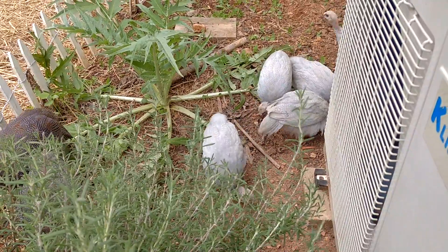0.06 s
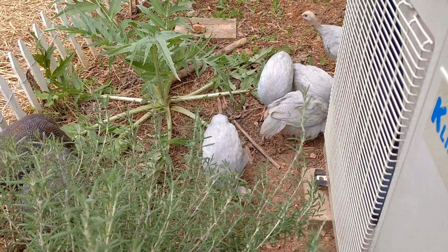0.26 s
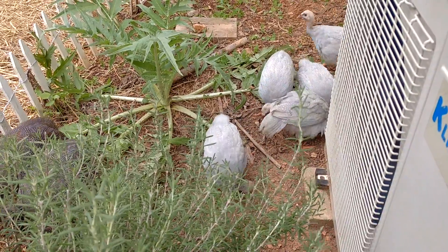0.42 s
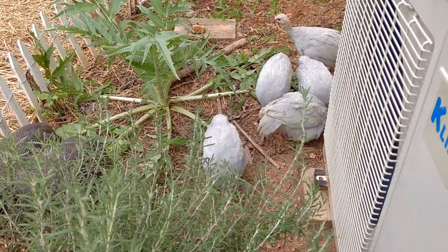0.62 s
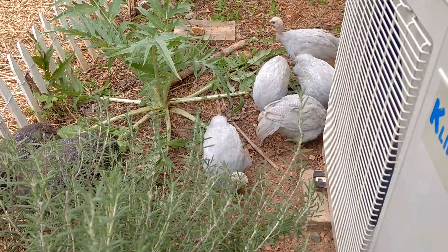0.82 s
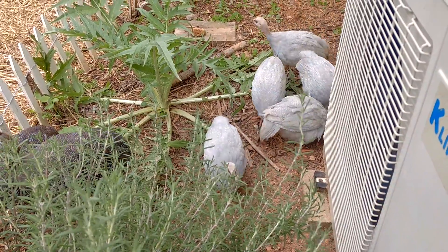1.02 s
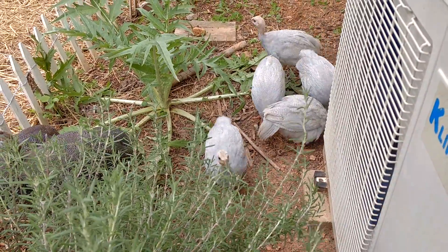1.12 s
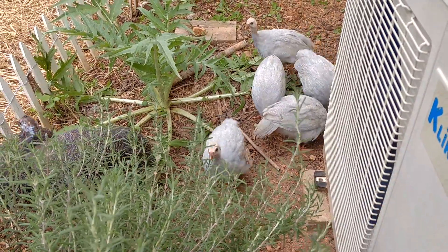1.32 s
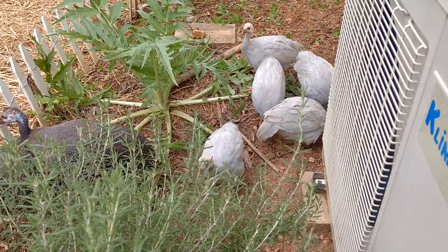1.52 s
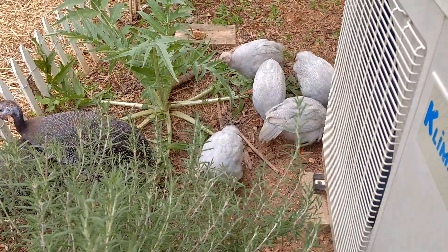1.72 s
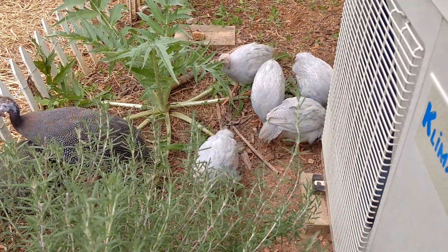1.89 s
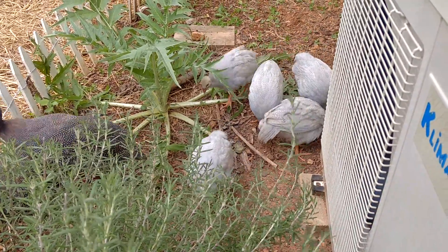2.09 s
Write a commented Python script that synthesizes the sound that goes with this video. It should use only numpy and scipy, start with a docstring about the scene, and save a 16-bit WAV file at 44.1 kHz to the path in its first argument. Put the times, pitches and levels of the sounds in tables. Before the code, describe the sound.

Guinea fowl forage in a yard: an adult gives two brief two-part calls and soft clucks, young birds whistle thin bending chirps, over a nearby fan's steady rush, with faint rustles and low air bumps on the microphone.

```python
"""A fan's broadband rush comes first, over a faint wavering hum; guinea fowl forage beside this cooling unit.
An adult gives two long two-voiced calls, soft notes and clucks: jittering near-sines, some with overtones and air.
The young whistle thin bending chirps. Gated noise makes ticks of litter and rustles of plants; air bumps the
microphones as short low swings. Sparse echoes scatter the birds around the yard, and the recorder widens the
stereo pair with a delayed, inverted crossfeed."""
import sys
import numpy as np
from scipy import signal
from scipy.fft import rfft, irfft, next_fast_len
from scipy.io import wavfile
from scipy.ndimage import uniform_filter1d, map_coordinates

SR = 44100
rng = np.random.default_rng(int(sys.argv[2]) if len(sys.argv) > 2 else 0)


def wav_out(sig):
    """Save sig, one row per channel (or a flat mono array), as 16-bit PCM at SR to the path in sys.argv[1]."""
    wavfile.write(sys.argv[1], SR, np.round(np.clip(np.atleast_2d(sig).T, -1, 1) * 32767).astype(np.int16))


N = 94815  # length in samples

FAR_MIC_DB = -19  # birds at the left microphone, relative to the right
ADULT_LAG_MS = 0.15  # later arrival at the left microphone
RASP_RATE_HZ = 960  # upper rate of the irregular flutter in a voice
AIR_HZ, AIR_WIDTH_HZ = 2496, 1100  # band of breath noise in the adult's voice
LOW_PHASE = 2.21  # radians by which the left channel leads in the air bumps


def amp(db):
    """Decibels to gain."""
    return 10 ** (np.asarray(db) / 20)


def unit(x):
    """Scales to rms 1."""
    return x / np.sqrt(np.mean(x ** 2) + 1e-20)


def read(points, hz):
    """Reads a table on a log-frequency axis."""
    f, value = np.transpose(points)
    return np.interp(np.log(hz + 1), np.log(f), value)


def add(mix, s, sound):
    """Mixes a stereo sound in at a time in seconds."""
    part = mix[:, max(round(s * SR), 0):][:, :sound.shape[1]]
    part += sound[:, :part.shape[1]]


def wander(size, rate_hz):
    """Smooth random motion: noise of rms 1, rolled off above a rate."""
    f = np.fft.rfftfreq(N, 1 / SR)
    spectrum = rfft(rng.standard_normal(N)) / (1 + (f / rate_hz) ** 4)
    return unit(irfft(spectrum, N))[:size]


def hiss(size, centre_hz, width_hz):
    """A band of noise of about rms 1: a carrier whose strength and pitch both wander."""
    strength = wander(size, width_hz)
    hz = centre_hz + width_hz / 2 * wander(size, 300)
    return np.sqrt(2) * strength * np.cos(2 * np.pi * np.cumsum(hz) / SR)


def place(x, lag_ms, far_db=FAR_MIC_DB):
    """A sound reaches the left microphone weaker and at a slightly different time."""
    at = np.arange(len(x)) - lag_ms * SR / 1000
    left = amp(far_db) * map_coordinates(x, [at], order=3)
    return np.array([left, x])


def syrinx(hz, gain, overtones_db, jitter, rasp=0):
    """A near-sine with overtones; its pitch jitters and its strength may flutter."""
    phase = 2 * np.pi * np.cumsum(hz * (1 + jitter * wander(len(hz), 240))) / SR
    overtones = sum(amp(db) * np.sin((k + 2) * phase) for k, db in enumerate(overtones_db))
    tone = np.sin(phase) + overtones
    return np.sqrt(2) * gain * tone * (1 + rasp * wander(len(hz), RASP_RATE_HZ))


def arch(length):
    """Progress 0-1 through a note, and a half-sine swell."""
    u = np.linspace(0, 1, round(length * SR))
    return u, np.abs(np.sin(np.pi * u))


def follow(curve):
    """Pitch and level of a voice, sample by sample."""
    s, hz, db = np.transpose(curve)
    t = np.arange(s[0], s[-1], 1 / SR)
    return np.interp(t, s, hz), np.interp(t, s, db)


# Upper voice of the two long calls, one curve per call: t/s, f/Hz, level/dB
UPPER_CURVES = [
    [(.194, 1610, -46), (.204, 1616, -37), (.214, 1647, -28.5), (.234, 1633, -24.5), (.251, 1643, -25.5),
     (.267, 1580, -38), (.277, 1680, -41), (.302, 1780, -48)],
    [(1.083, 1526, -47), (1.097, 1587, -35), (1.124, 1522, -29.5), (1.133, 1632, -23.5), (1.141, 1647, -26),
     (1.152, 1620, -26.5), (1.168, 1694, -32), (1.203, 2050, -40)],
]
# Its overtones from the 2nd harmonic up: level/dB relative to the fundamental
UPPER_OVERTONES = [-27]


def upper_voice():
    """One side of the adult's syrinx: a nearly pure tone with a slight flutter."""
    out = np.zeros((2, N))
    for curve in UPPER_CURVES:
        hz, db = follow(curve)
        voice = syrinx(hz, amp(db), UPPER_OVERTONES, jitter=0.0058, rasp=0.032)
        add(out, curve[0][0], place(voice, ADULT_LAG_MS))
    return out


RASP_DB, AIR_DB = -33, -16  # flutter depth at full effort; breath noise relative to the tone
FULL_DB, OVERTONE_GROWTH = -23, 1.2  # level of full effort; dB lost by overtones and rasp per dB below it
# Lower voice of the two long calls, one curve per call: t/s, f/Hz, level/dB
LOWER_CURVES = [
    [(.24, 1448, -54), (.255, 1374, -32), (.263, 1281, -24.5), (.275, 1265, -26.5), (.290, 1330, -25),
     (.300, 1360, -25.5), (.305, 1470, -40), (.310, 1390, -38), (.317, 1400, -52)],
    [(1.083, 1305, -65), (1.097, 1289, -32.5), (1.122, 1274, -29.5), (1.147, 1330, -31),
     (1.160, 1274, -21.5), (1.170, 1266, -18.5), (1.180, 1323, -20.5), (1.191, 1350, -23.5),
     (1.201, 1460, -24), (1.207, 1560, -51), (1.212, 1520, -27), (1.219, 1460, -61)],
]
# Its overtones from the 2nd harmonic up, at full effort: level/dB relative to the fundamental
LOWER_OVERTONES = [-6.5, -14.5, -30.5]


def lower_voice():
    """The richer side of the syrinx: overtones and rasp grow with effort, over breath noise."""
    out = np.zeros((2, N))
    for curve in LOWER_CURVES:
        hz, db = follow(curve)
        effort_db = np.minimum(db - FULL_DB, 0) * OVERTONE_GROWTH
        overtones = [level + effort_db for level in LOWER_OVERTONES]
        voice = syrinx(hz, amp(db), overtones, jitter=0.0027, rasp=amp(RASP_DB + effort_db))
        air = amp(db + AIR_DB) * hiss(len(hz), AIR_HZ, AIR_WIDTH_HZ)
        add(out, curve[0][0], place(voice + air, ADULT_LAG_MS))
    return out


# Soft, level notes of the adult: start t/s, length t/s, f/Hz, peak level/dB
QUIET_NOTES = [(0.04, 0.04, 1540, -42), (0.032, 0.029, 2160, -44.5), (0.151, 0.023, 1543, -46),
               (0.15, 0.023, 2300, -42), (0.18, 0.037, 2350, -43), (0.226, 0.062, 2340, -37),
               (0.265, 0.039, 2170, -40), (0.719, 0.036, 2365, -34), (.738, 0.016, 3180, -42),
               (0.922, 0.043, 2315, -36.5), (0.936, 0.025, 1557, -35.5), (0.939, 0.021, 1276, -33.5),
               (0.981, 0.05, 3575, -40.5), (1.069, 0.067, 2297, -31), (1.13, 0.026, 2334, -26),
               (1.139, 0.056, 2144, -39)]


def soft_notes():
    """Steady-pitched tones without overtones that swell and fade, with a marked flutter."""
    out = np.zeros((2, N))
    for start, length, hz, db in QUIET_NOTES:
        u, swell = arch(length)
        note = syrinx(hz + 0 * u, amp(db) * swell ** 0.72, [], jitter=0.0088, rasp=0.21)
        add(out, start, place(note, ADULT_LAG_MS))
    return out


CLUCK_FALL = 0.15  # pitch drop over a cluck, as a share of its middle pitch
CLUCK_SHARP = 2.6  # how pointed a cluck swells
CLUCK_AIR_DB, CLUCK_FAR_MIC_DB = -16.5, -8  # puff of air relative to the tone; left relative to right
# Clucks: centre t/s, length t/s, f/Hz, peak level/dB, 2nd and 3rd harmonic level/dB, left lag t/ms
CLUCK_NOTES = [(0.4259, 0.026, 1097, -27, -20, -1.5, 0.17), (.754, .028, 863, -30.5, -13, -22, 0.25),
               (1.862, .019, 1414, -22.5, -2.5, -6, -0.14)]


def clucks():
    """Short falling tones with two strong harmonics, a rough flutter and a puff of air."""
    out = np.zeros((2, N))
    for centre, length, hz, db, second_db, third_db, lag_ms in CLUCK_NOTES:
        u, swell = arch(length)
        falling_hz = hz * (1 - CLUCK_FALL * (u - .5))
        gain = amp(db) * swell ** CLUCK_SHARP
        tone = syrinx(falling_hz, gain, [second_db, third_db], jitter=0.0067, rasp=0.33)
        puff_gain = amp(db + CLUCK_AIR_DB) * swell ** (2 * CLUCK_SHARP)
        puff = puff_gain * hiss(len(u), AIR_HZ, AIR_WIDTH_HZ)
        add(out, centre - length / 2, place(tone + puff, lag_ms, CLUCK_FAR_MIC_DB))
    return out


def adult():
    """Two voices of one syrinx sound the long calls; soft notes and clucks come around them."""
    return upper_voice() + lower_voice() + soft_notes() + clucks()


YOUNG_FAR_MIC_DB = -19.5  # the young at the left microphone, relative to the right
CHIRP_ARCH, CHIRP_OCTAVE_DB = 1.3, -28  # power of the swell; 2nd harmonic relative to the fundamental
# Chirps: start t/s, length t/s, start f/Hz, middle f/Hz, end f/Hz, peak level/dB, left lag t/ms
YOUNG_CHIRPS = [(0.124, 0.036, 3110, 2740, 2500, -50, 0.16), (0.169, 0.064, 3780, 3470, 2840, -38, 0.19),
                (0.394, .035, 1810, 2350, 2230, -34.5, 0.067), (0.425, 0.055, 2690, 2470, 2330, -43, 0.12),
                (0.59, 0.063, 2105, 2588, 2110, -26, 0.26), (0.948, 0.067, 5250, 4900, 4600, -49.5, .2),
                (.994, .03, 4570, 3950, 3350, -30.5, 0.19), (1.022, 0.012, 3550, 3030, 2520, -40, 0.22),
                (1.008, .06, 2660, 2430, 2370, -39.5, 0.27), (1.44, 0.046, 2620, 2370, 2320, -44, 0.28),
                (1.507, 0.064, 2297, 2815, 2320, -30, 0.44), (1.552, 0.015, 3950, 3790, 3700, -46.5, 0.19),
                (1.753, 0.09, 2087, 2915, 2880, -38, 0.27), (1.80, 0.05, 2816, 3080, 3330, -40.5, 0.2),
                (1.842, 0.01, 3800, 3360, 3060, -36, 0.14), (1.848, .012, 2950, 2870, 2700, -29.5, 0.27),
                (1.903, 0.043, 4720, 4320, 4120, -52, 0.14), (1.927, 0.0338, 4026, 3800, 3230, -35, 0.16),
                (1.922, 0.034, 2430, 2300, 2060, -48, 0.24)]


def young():
    """Thin whistles that bend smoothly through three pitches."""
    out = np.zeros((2, N))
    for start, length, first_hz, middle_hz, last_hz, db, lag_ms in YOUNG_CHIRPS:
        u, swell = arch(length)
        bend = np.polyfit([0, .5, 1], [first_hz, middle_hz, last_hz], 2)
        gain = amp(db) * swell ** CHIRP_ARCH
        chirp = syrinx(np.polyval(bend, u), gain, [CHIRP_OCTAVE_DB], jitter=0.0057, rasp=0.06)
        add(out, start, place(chirp, lag_ms, YOUNG_FAR_MIC_DB))
    return out


TICK_S = .001  # decay to 1/e
# Ticks of dry litter underfoot: t/s, f/Hz, level/dB (before a doubling of the gain)
LITTER_TICKS = [(0.061, 5300, -44), (.753, 12500, -30), (1.10, 12000, -32), (1.494, 11000, -39),
                (1.87, 13500, -28.5), (1.9, 6200, -41), (1.90, 12800, -41)]


def litter():
    """Dry stalks snap under the birds' feet: noise bands that die within milliseconds."""
    out, t = np.zeros((2, N)), np.arange(600) / SR
    for s, hz, db in LITTER_TICKS:
        snap = wander(len(t), 2300) * np.cos(2 * np.pi * hz * t) * np.exp(-t / TICK_S)
        add(out, s, place(2 * amp(db) * snap, ADULT_LAG_MS))
    return out


RUSTLE_GRAIN_DB = 3  # rms of the random level changes
# Rustles of leaves and straw: centre t/s, half width to 1/e t/s, centre f/Hz, noise width f/Hz, level/dB
PLANT_RUSTLES = [(0.34, 0.048, 3700, 500, -45.5), (.72, 0.085, 3700, 570, -46.5),
                 (1.09, 0.045, 5300, 1160, -45.5), (1.09, .04, 12000, 2600, -42),
                 (0.31, 0.043, 9500, 2900, -48), (2.2, 0.029, 3600, 487, -40),
                 (1.422, 0.058, 5500, 1100, -51.5)]


def rustles():
    """Grainy swishes of banded noise as the birds push through the plants."""
    t = np.arange(N) / SR
    swish = np.zeros(N)
    for centre, width, hz, band_hz, db in PLANT_RUSTLES:
        grain = amp(db + RUSTLE_GRAIN_DB * wander(N, 270))
        swell = np.exp(-((t - centre) / width) ** 2)
        swish += grain * swell * hiss(N, hz, band_hz)
    return place(swish, ADULT_LAG_MS)


# Dull bumps of air on the microphones: centre t/s, half width to 1/e t/s, f/Hz, peak level/dB
AIR_BUMPS = [(.02, 0.044, 74, -31), (.96, .025, 64.7, -38), (1.031, .015, 113, -32),
             (1.44, 0.033, 65.4, -37), (0.3425, 0.004, 131, -13), (0.376, 0.03, 81.6, -26),
             (0.506, 0.013, 124, -23), (1.268, 0.017, 78, -30), (1.387, 0.017, 115, -21.5),
             (1.578, 0.0018, 142, -18), (1.598, 0.0033, 158, -18), (1.609, 0.0031, 251, -14),
             (1.635, 0.015, 80, -28.5)]


def bumps():
    """Short, low swings of pressure under a bell-shaped swell, the left leading in phase."""
    out = np.zeros((2, N))
    lead = np.array([[LOW_PHASE], [0]])
    for centre, width, hz, db in AIR_BUMPS:
        t = np.arange(N) / SR - centre
        out += amp(db) * np.exp(-(t / width) ** 2) * np.cos(2 * np.pi * hz * t + lead)
    return out


# Motor and blades: f/Hz, level/dB
MOTOR_HUM = [(120, -48), (150, -48.5), (527, -60.5)]


def hum():
    """Steady sines whose pitches waver slightly, the left leading by half the bass phase."""
    out = np.zeros((2, N))
    lead = np.array([[LOW_PHASE / 2], [0]])
    for f, db in MOTOR_HUM:
        wavering_hz = f * (1 + 0.01367 * wander(N, 5.54))
        out += np.sqrt(2) * amp(db) * np.sin(2 * np.pi * np.cumsum(wavering_hz) / SR + lead)
    return out


RUSH_DB = -37  # rms of the rush over both channels
BODY_FOLLOW, TREBLE_FOLLOW = 0.86, 1.0  # share of each swell that is applied
# Colour of the rush: f/Hz, relative level/dB per Hz
RUSH_COLOUR = [(20, -16), (45, -40), (75, -13), (130, -1.5), (220, -3), (310, -7.5), (400, -10),
               (560, -5.5), (850, -14.5), (1020, -15), (1400, -23.5), (2000, -30.5), (2500, -24),
               (3050, -29), (3800, -24), (4300, -42), (4850, -39.5), (5350, -28), (5700, -34), (6000, -25),
               (6500, -36), (7000, -28.5), (7900, -21), (8800, -29), (10500, -30.5), (13000, -22),
               (16000, -22.5)]
# Left microphone relative to the right: f/Hz, level/dB
LEFT_COLOUR = [(50, 2.5), (150, 2.5), (280, -7), (400, -9), (650, -2), (1000, -6), (1600, 3), (4000, -23),
               (5000, -9.5), (9000, 1), (14000, -12)]
# Likeness of the two microphones: f/Hz, correlation [0-1]
LIKENESS = [(60, 0.43), (200, 1), (300, 1), (370, 0.75), (560, 0.65), (850, 0.85), (1300, 0.05),
            (4000, 0.017), (15000, 0.024)]
# Swells of the rush, used about their mean: t/s, body level/dB, treble level/dB
RUSH_SWELL = [(0.0, -45.5, -52.5), (0.42, -39.5, -48), (0.74, -40, -44), (0.75, -41.5, -43),
              (0.77, -42, -48), (0.94, -43, -48), (1.07, -39.5, -44), (1.24, -40.5, -48.5),
              (1.43, -41.5, -43), (1.53, -49, -52.5), (1.74, -46, -52.5), (1.91, -45, -46),
              (1.94, -47, -50.5), (2.15, -43.5, -51.5)]


def fan(patchy_db=1.16, flicker_db=0.6):
    """Turbulent rush of shaped noise whose body and hiss swell, over a faint wavering hum."""
    frames, hz = N // 256 + 5, np.fft.rfftfreq(1024, 1 / SR)
    a, b, c, d, patches = rng.standard_normal((5, frames, 513))
    patches = uniform_filter1d(patches, size=8, axis=0)  # smooth in time
    patches = unit(uniform_filter1d(patches, size=16, axis=1))  # and in frequency
    s, body, treble = np.transpose(RUSH_SWELL)
    t = np.arange(frames) * 256 / SR
    body, treble = (np.interp(t, s, level - level.mean())[:, None] for level in (body, treble))
    high = read([(2000, 0.036), (11000, 0.94)], hz)  # share of each frequency that moves with the treble
    field = read(RUSH_COLOUR, hz) + (1 - high) * BODY_FOLLOW * body + high * TREBLE_FOLLOW * treble
    flicker = flicker_db * high * rng.standard_normal((frames, 1))
    field = field + patchy_db * patches + flicker
    # The left shares part of the right's noise, turned in phase in the bass
    same = np.clip(read(LIKENESS, hz), 0, 1)
    turn = np.exp(1j * LOW_PHASE * read([(100, 0.51), (310, 0.27), (420, 0)], hz))
    right, own = a + 1j * b, c + 1j * d
    left = amp(read(LEFT_COLOUR, hz)) * (same * turn * right + np.sqrt(1 - same ** 2) * own)
    spectra = (np.array([left, right]) * amp(field)).swapaxes(1, 2)
    rush = signal.istft(spectra, nperseg=1024, noverlap=768)[1][:, :N]
    return amp(RUSH_DB) * unit(rush) + hum()


YARD_T60, YARD_DB = 0.28, -18  # seconds to fall 60 dB; level of the scatter


def yard(x):
    """A brief scatter of sparse random echoes from the ground, the casing and the plants."""
    t = np.arange(SR // 3) / SR
    shape = (2, len(t))
    sparse = rng.standard_normal(shape) * (rng.random(shape) < .05)
    taps = sparse * (t > .005) * amp(-60 * t / YARD_T60)
    taps *= amp([[FAR_MIC_DB], [0]]) / np.linalg.norm(taps, axis=1, keepdims=True)
    # The right microphone's sound feeds the echoes of both channels
    return x + amp(YARD_DB) * signal.fftconvolve(x[1:], taps, axes=1)[:, :N]


def scene():
    """Birds in the yard, with the fan beside them and air on the microphones."""
    return yard(adult() + young() + litter() + rustles()) + fan() + bumps()


CROSS_S, EDGE_HZ = 1 / 2232, 15950  # crossfeed delay in seconds; upper band limit
# Stereo widener: f/Hz, share of the opposite channel subtracted [0-1]
WIDENER = [(20, 0), (700, 0), (1100, .8), (2000, .99), (4500, .99), (6700, .95), (9000, .68), (11000, .5),
           (15000, .33)]
# Tilt between the output channels: f/Hz, left minus right level/dB
CHANNEL_TILT = [(60, -0.5), (300, 1.5), (950, -1), (1300, 4), (1650, 3), (2100, 2), (3000, -6), (3900, 0.5),
                (4500, -3), (15000, -1)]


def record(dry):
    """Each channel subtracts a delayed share of the other; then tilt and the band limit."""
    size = next_fast_len(N + 2048)
    hz, z = np.fft.rfftfreq(size, 1 / SR), rfft(dry, size)
    cross = np.clip(read(WIDENER, hz), 0, 1) * np.exp(-2j * np.pi * hz * CROSS_S)
    tilt = amp(read(CHANNEL_TILT, hz) * np.array([[.5], [-.5]]))
    wide = irfft((z - cross * z[::-1]) * tilt, size)[:, :N]
    band_limit = signal.firwin(511, EDGE_HZ, window=("kaiser", 9), fs=SR)
    return signal.oaconvolve(wide, band_limit[None], "same")


dry = scene()
out = record(dry)
wav_out(out)
```